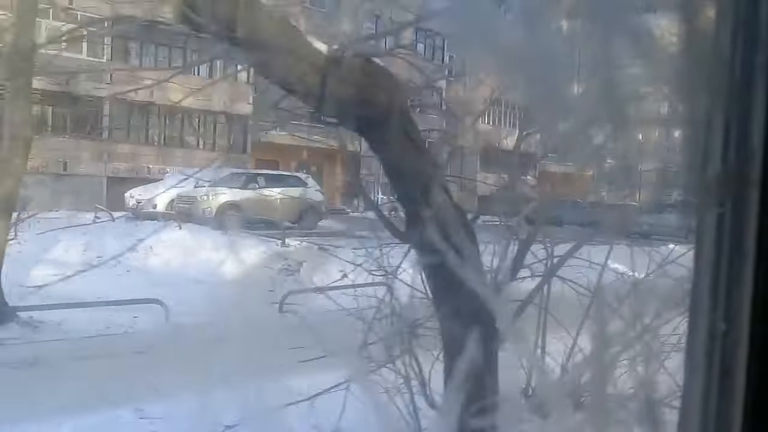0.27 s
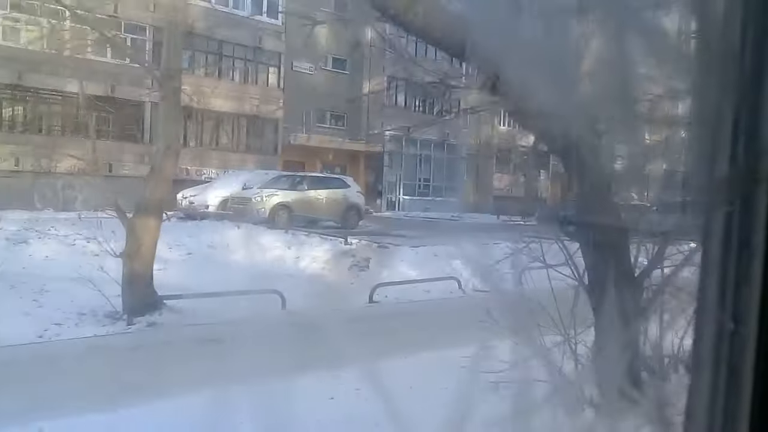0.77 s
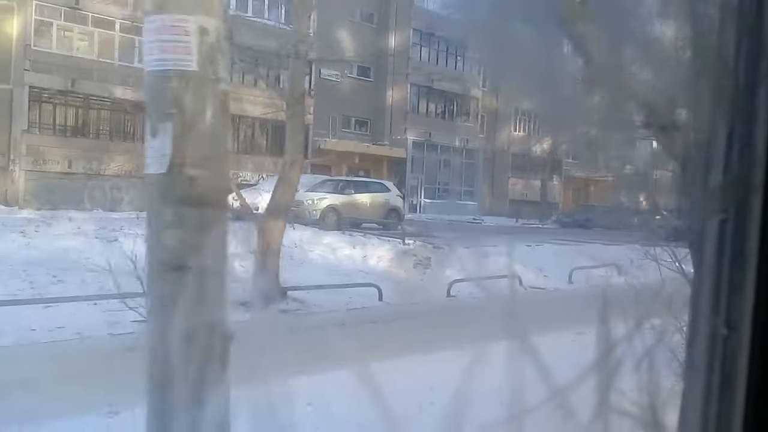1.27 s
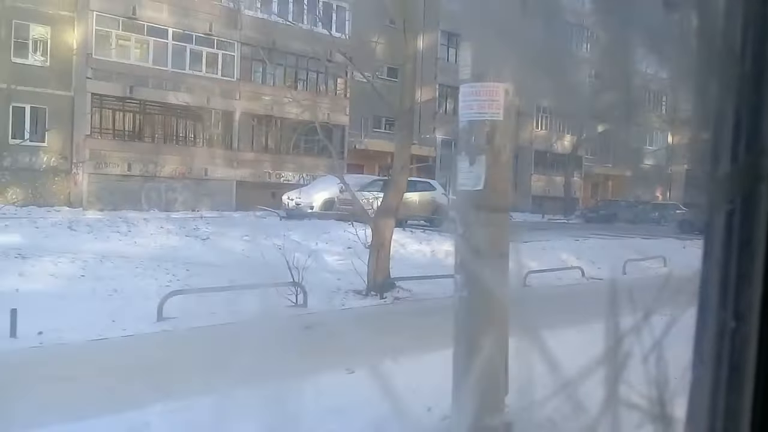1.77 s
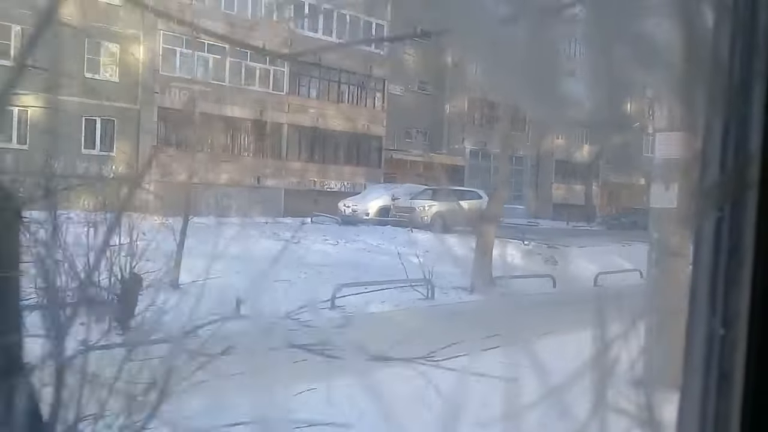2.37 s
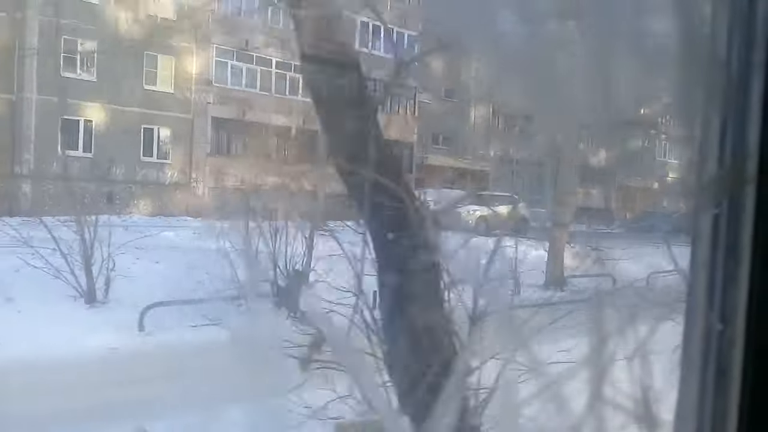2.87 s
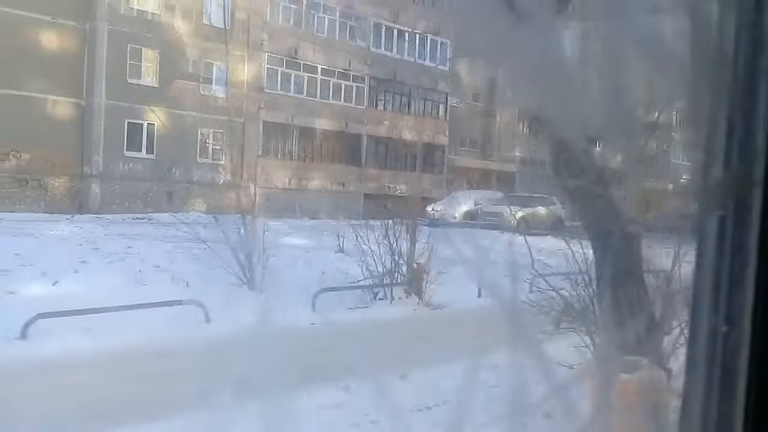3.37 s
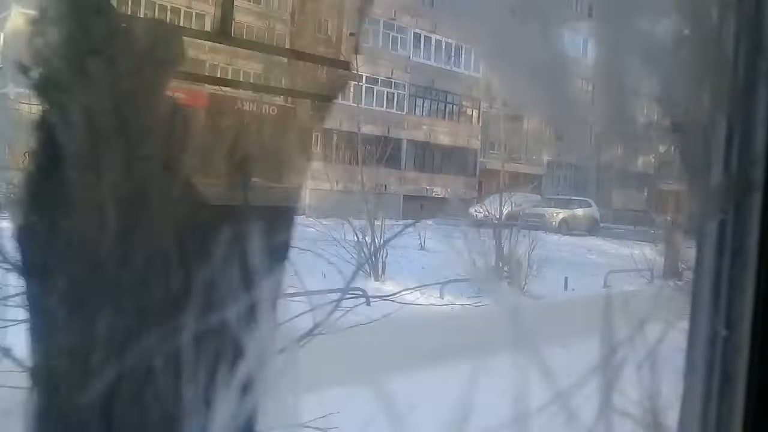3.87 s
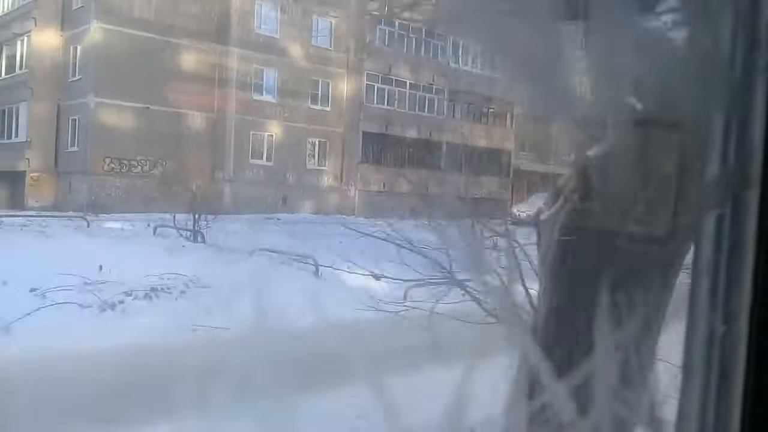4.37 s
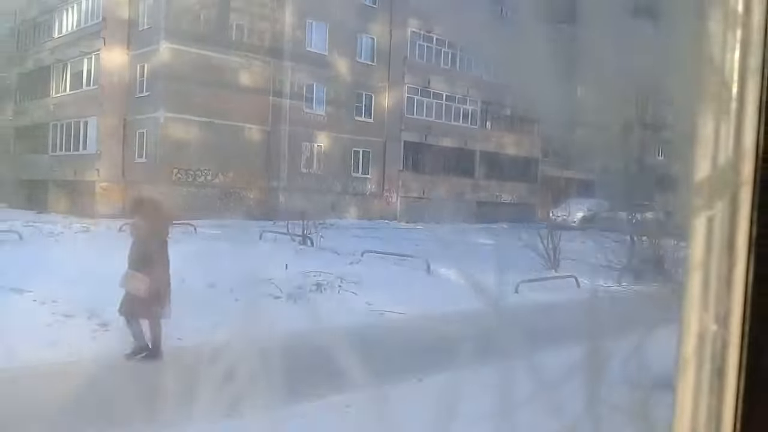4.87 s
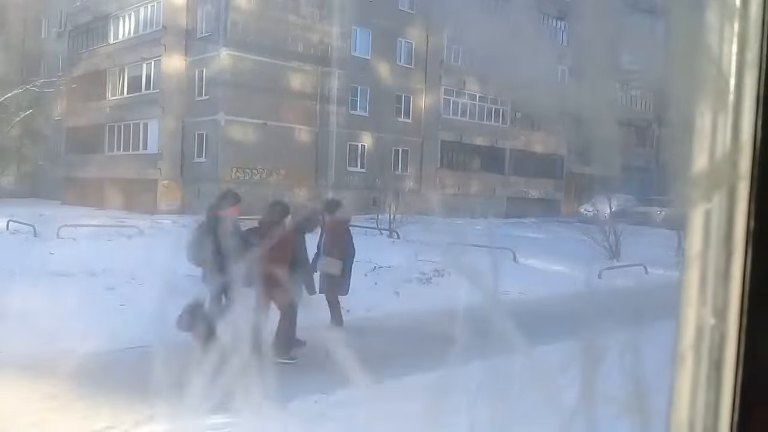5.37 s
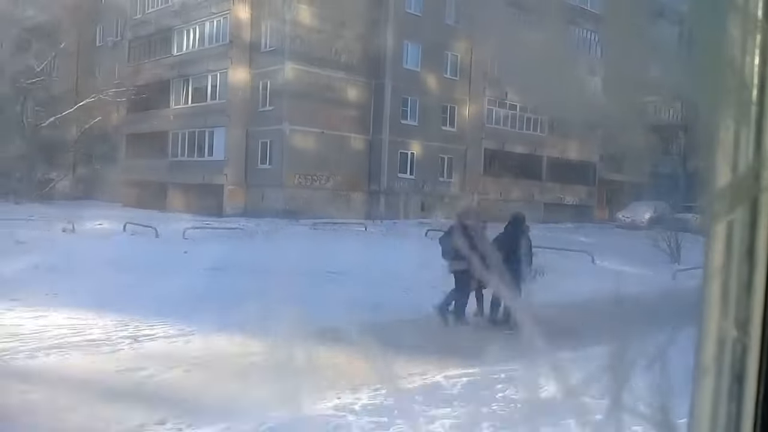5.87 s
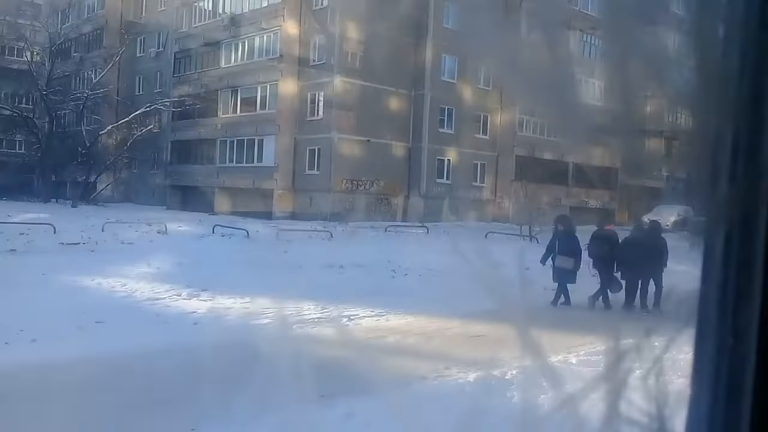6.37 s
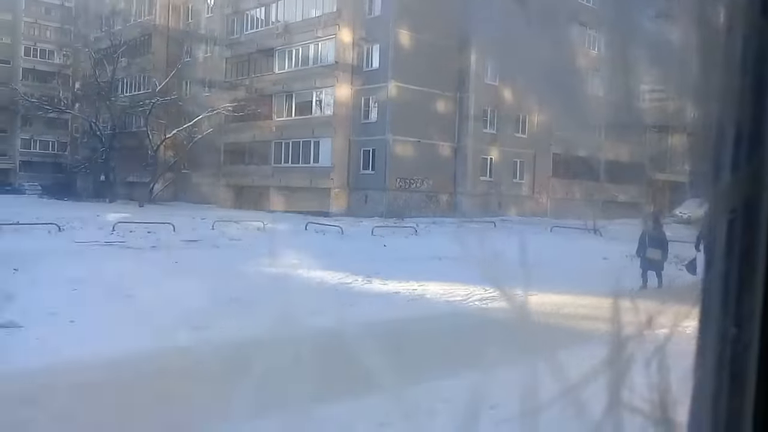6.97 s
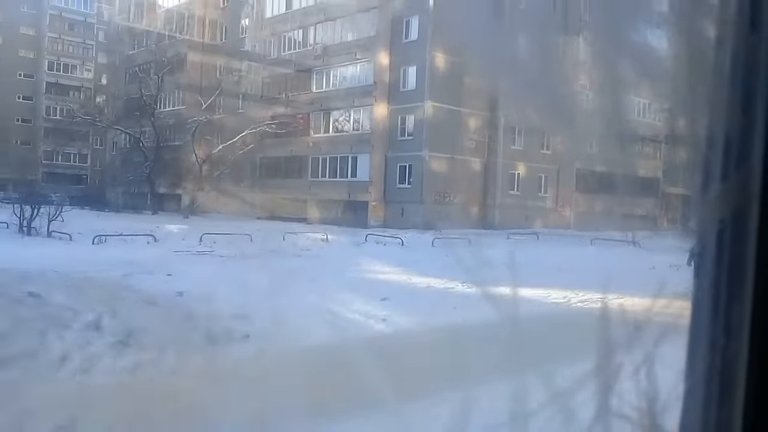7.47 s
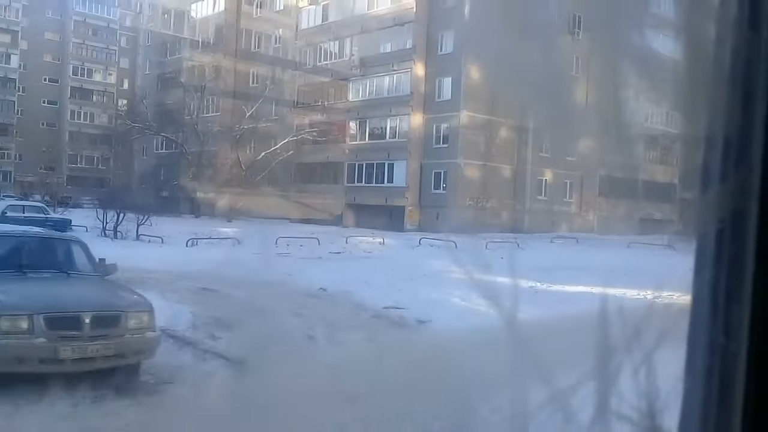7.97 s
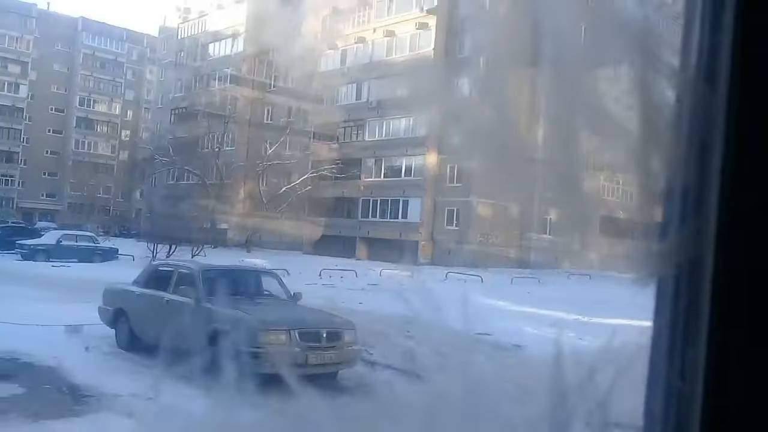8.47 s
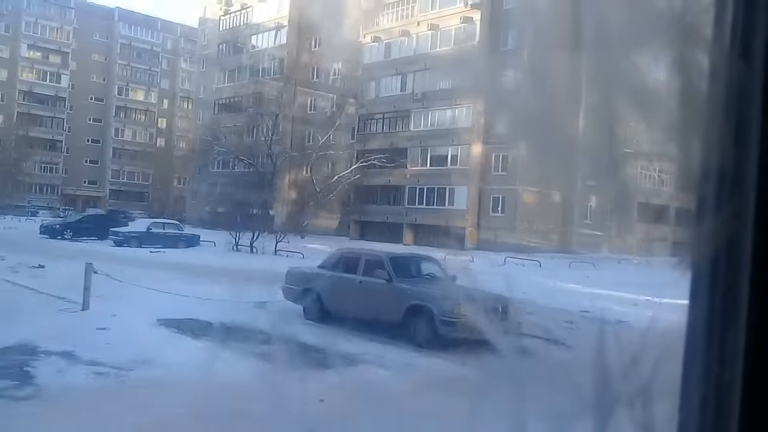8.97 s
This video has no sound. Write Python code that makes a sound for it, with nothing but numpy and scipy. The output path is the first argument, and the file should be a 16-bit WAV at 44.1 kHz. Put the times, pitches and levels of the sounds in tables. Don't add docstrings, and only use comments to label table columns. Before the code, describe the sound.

The sound is inside an electric bus gathering speed on packed snow, picked up by a small, dull microphone at the window. From the start a nearly constant low auxiliary hum with a beating fan tone sits over soft body rumble. Shaft and gear tones climb steadily, fastest in the first seconds, and tyre roar grows with them. At about 1.5 s a short rattle and pane knock; at 3.3 s a dull bump. The fan tone fades as the traction whine strengthens, dipping briefly around 4.3 and 5.2 s as the pull steps. Another knock comes near 5 s, with sparse dry ticks and a light rattle at 6.7 s. After 7.2 s the pull eases and the hum briefly drops. From 8.1 to 8.6 s ruts bring heavy thuds and a loud, bright, glassy clatter, strongest around 8.3, 8.4 and 8.6 s. It dies quickly, leaving roar, tones and small rattles until 9.2 s.

```python
import sys
import numpy as np
from scipy import signal
from scipy.io import wavfile
from scipy.ndimage import uniform_filter1d

SR = 44100
rng = np.random.default_rng(int(sys.argv[2]) if len(sys.argv) > 2 else 0)


def log_audio(samples):
    frames = np.atleast_2d(samples).T
    limited = np.clip(frames, -1, 1)
    pcm = np.round(limited * 32767).astype(np.int16)
    wavfile.write(sys.argv[1], SR, pcm)


def convert_level_to_amplitude(level_db):
    exponent = np.asarray(level_db, float) / 20
    return 10 ** exponent


N = 407043


def evened(x):
    return x / np.sqrt(np.mean(x ** 2) + 1e-20)


def read(points, hz):
    f, value = np.transpose(points)
    return np.interp(np.log(hz + 1), np.log(f + 1), value)


def columns(rows):
    s, *values = np.transpose(rows)
    return [np.interp(np.arange(N) / SR, s, v) for v in values]


def add(mix, s, sound):
    part = mix[round(s * SR):][:len(sound)]
    part += sound[:len(part)]


def band(x, order, low_hz, high_hz):
    sos = signal.butter(order, [low_hz, high_hz], "band", fs=SR, output="sos")
    return signal.sosfilt(sos, x)


def drift(top_hz, low_hz=.3):
    t = np.arange(0, N + 200, 200) / SR
    waves = 0
    for f in np.geomspace(low_hz, top_hz, num=24):
        waves = waves + np.sin(2 * np.pi * (f * t + rng.random())) / np.sqrt(f)
    return np.interp(np.arange(N) / SR, t, evened(waves))


def coloured(x, points):
    level_db = np.maximum(read(points, abs(np.fft.fftfreq(8192, 1 / SR))), -100)
    log_gain = np.log(convert_level_to_amplitude(level_db))
    taps = np.fft.ifft(np.exp(np.conj(signal.hilbert(log_gain)))).real[:4096]
    return signal.oaconvolve(x, taps)[:len(x)]


def tone(hz, db, waver_db, waver_hz):
    turns = np.cumsum(hz + waver_hz * drift(6.0)) / SR + rng.random()
    level_db = db + waver_db * np.clip(drift(9.0), -2, 1)
    return np.sqrt(2) * convert_level_to_amplitude(level_db) * np.sin(2 * np.pi * turns)


def patchy(points, size, patchy_db):
    frames, hz = 4 * N // size + 5, np.fft.rfftfreq(size, 1 / SR)
    a, b, patches = rng.standard_normal((frames, len(hz), 3)).T
    patches = uniform_filter1d(patches, size=12, axis=0)
    patches = evened(uniform_filter1d(patches, size=10, axis=1))
    z = (a + 1j * b) * convert_level_to_amplitude(read(points, hz)[:, None] + patchy_db * patches)
    return evened(signal.istft(z, nperseg=size, noverlap=size - size // 4)[1][:N])


# time in seconds, turns of the traction shaft in Hz.
SHAFT_SPEED = [(0, 55), (1, 66.28), (1.75, 75.94), (2.5, 81.86), (3.75, 93.4), (4.75, 101.4), (5.5, 107.3),
               (6.5, 114), (7.75, 118.3), (8.7, 123.6), (9.23, 124.3)]


def shaft_speed():
    return columns(SHAFT_SPEED)[0]


# frequency in Hz, level in dB per Hz.
BODY_RUMBLE = [(33, -35), (40, -16), (60, -3), (85, 0.5), (130, 1), (200, -1), (260, -7.5), (330, -9),
               (480, -15), (560, -22), (750, -22), (1000, -27.5), (2000, -78)]
# frequency in Hz, level in dB per Hz.
TYRE_ROAR = [(350, -30), (600, 3), (650, -4.5), (753, -6.5), (892, -11), (1240, -5), (1370, -6.5),
             (1880, -12), (2770, -14.5), (3250, -17), (3850, -33.5), (5050, -32.5), (6330, -54),
             (9000, -64), (11700, -88.5), (19800, -120)]
# its start, full depth, end of full depth and end, all in seconds.
RUTTED_PATCH = (7.9, 8.38, 8.5, 8.66)


def road():
    gained_hz = shaft_speed()
    gained_hz = gained_hz - gained_hz[0]
    ruts = np.interp(np.arange(N) / SR, RUTTED_PATCH, (0, 1, 1, 0))
    rumble_db = -24 + 0.0247 * gained_hz + 8 * ruts
    roar_db = -45.5 + 0.0728 * gained_hz + 4 * ruts
    buzz_db = -5.5 + 0.105 * gained_hz
    rumble = convert_level_to_amplitude(rumble_db) * patchy(BODY_RUMBLE, size=4096, patchy_db=1.52)

    t = np.arange(round(.3 * SR)) / SR
    echoes = rng.standard_normal(len(t)) * convert_level_to_amplitude(-60 * t / 0.13)
    roar = patchy(TYRE_ROAR, size=512, patchy_db=0.68)
    roar = roar + 0.42 * evened(signal.oaconvolve(roar, echoes)[:N])
    highpass = signal.butter(4, 3600, "high", fs=SR, output="sos")
    buzz = signal.sosfiltfilt(highpass, roar, padlen=300)
    roar = roar + (convert_level_to_amplitude(buzz_db) - 1) * buzz
    flicker_db = 0.85 + 0.2 * drift(40.0, low_hz=3.0)
    return rumble + convert_level_to_amplitude(roar_db + flicker_db) * evened(roar)


# time in seconds, shaft speed in Hz, level of its hum in dB.
AUX_MOTOR = [(0, 46.9, -26), (1.75, 46.78, -25.5), (3, 46.1, -24.5), (3.85, 45.83, -23), (5, 46.5, -25),
             (6.5, 47.27, -27.5), (7.3, 47.31, -26), (7.5, 47.34, -39), (7.8, 47.4, -39.5),
             (8.1, 47.5, -26.5), (9.23, 47.65, -32)]
AUX_MAIN_ORDERS = (1.0, 3.085, 5.0)
# multiple of the shaft speed, level in dB against the main tone it follows,
# which tone that is (0 shaft, 1 fan, 2 hum).
AUX_WEAK_TONES = [(3.0, -11, 1), (3.19, -14, 1), (6.17, -19, 1), (6.0, -14, 2), (9.0, -24, 2),
                  (12.0, -29, 2), (13.0, -34, 1), (15.0, -16, 0)]


def auxiliary():
    hz, hum_db = columns(AUX_MOTOR)
    sag_db = 4.5 * (hz - 47)
    shaft_db = -35.5 + sag_db
    fan_db = -19 + .6 * sag_db - 0.2748 * np.maximum(shaft_speed() - 81.2, 0)
    levels = shaft_db, fan_db, hum_db
    out = np.zeros(N)
    for k, db in zip(AUX_MAIN_ORDERS, levels):
        out += tone(k * hz, db, waver_db=0.8, waver_hz=0.27)
    for k, db, followed in AUX_WEAK_TONES:
        out += tone(k * hz, levels[followed] + db + 0.055, waver_db=1.0, waver_hz=0.081 * k)
    return out


# start in seconds, peak in dB.
TRIM_TICKS = [(0.4906, -52), (0.9016, -53.5), (1.527, -48.5), (1.954, -51.5), (2.037, -51.5),
              (2.1157, -51.5), (4.7035, -52), (4.894, -50), (4.9836, -46.5), (5.2874, -55.5),
              (5.453, -44.5), (5.9915, -55), (6.1855, -47), (6.42, -45.5), (6.545, -48), (7.3028, -46.5),
              (7.8396, -47), (7.9906, -46.5), (9.039, -46)]


def ticks():
    out = np.zeros(N)
    t = np.arange(900) / SR
    for s, db in TRIM_TICKS:
        puff = rng.standard_normal(900) * convert_level_to_amplitude(-60 * t / .035)
        puff = band(puff, 4, 3600, 5300) + .1 * band(puff, 2, 8000, 12000)
        add(out, s, convert_level_to_amplitude(db - 1.0) * puff / abs(puff).max())
    return out


# start in seconds, level in dB, pitch in Hz.
SUSPENSION_THUDS = [
    (8.08, -17, 115),
    (8.27, -21, 150),
    (8.415, -20, 190),
    (8.47, -21, 150),
    (3.29, -22, 125),
]


def thuds():
    out = np.zeros(N)
    t = np.arange(round(.4 * SR)) / SR
    for s, db, hz in SUSPENSION_THUDS:
        boom = evened(band(rng.standard_normal(len(t)), 3, .7 * hz, 1.5 * hz))
        add(out, s, convert_level_to_amplitude(db - 60 * t / .45) * (1 - np.exp(-t / .008)) * boom)
    return out


# start in seconds, peak in dB, pitch in Hz, time to fall 60 dB in seconds.
PANE_KNOCKS = [(1.571, -31.5, 2840, 0.091), (1.572, -47, 5000, 0.083), (1.6, -30, 2790, 0.11),
               (5.062, -28.5, 2330, 0.064), (6.709, -34, 2780, .05), (8.267, -15.5, 2806, 0.04),
               (8.28, -24, 2302, 0.059), (8.43, -34, 2940, 0.055), (8.565, -20, 2950, 0.054),
               (8.566, -17, 1430, 0.083), (8.935, -34, 2600, 0.04), (9.118, -26, 2770, 0.045)]


def knocks():
    out = np.zeros(N)
    t = np.arange(round(.4 * SR)) / SR
    for s, db, hz, t60 in PANE_KNOCKS:
        ring = sum(np.sin(2 * np.pi * (hz * k * t + rng.random())) for k in (.93, 1, 1.06))
        add(out, s, convert_level_to_amplitude(db - 7.5 - 60 * t / t60) * (1 - np.exp(-t / .0004)) * ring)
    return out


# frequency in Hz, level in dB per Hz.
TRIM_COLOUR = [(260, -58), (520, -4), (820, -7), (1130, -9), (1420, -4.5), (1850, -7), (2910, -1.5),
               (3400, -3), (3800, -14), (5110, -16), (6600, -33.5), (10500, -34), (13500, -41.5),
               (15800, -53.5)]
# pitch in Hz, width of the resonance in Hz, level in dB.
RINGING_PANES = [(1370, 47, -11), (1940, 230, 1.5), (2436, 110, -4), (2940, 130, -3), (3320, 50, 3),
                 (4240, 54, -16), (4970, 74, -15.5)]


def rattle(db, tilt_db, rise):
    t = np.arange(round(.6 * SR)) / SR
    strength = convert_level_to_amplitude(1.1 * np.minimum(rng.exponential(1, len(t)), 3))
    struck = rng.random(len(t)) < 900 / SR
    hits = strength * struck * rng.choice([-1, 1], len(t))
    drive = evened(evened(hits) + 0.95 * rng.standard_normal(len(t)))
    clumps = evened(uniform_filter1d(rng.standard_normal(len(t)), size=130))
    drive = evened(drive * convert_level_to_amplitude(1.8 * clumps))

    hold = .028 + .6 * rise
    after = np.maximum(t - rise - hold, 0)
    decay = convert_level_to_amplitude(-60 * after / .26) + .3 * convert_level_to_amplitude(-60 * after / .6)
    shape = np.clip(t / max(rise, .001), 0, 1) * decay

    fizz_db = min(-9 + 1.1 * max(db + 33.5, 0), 3)
    colour = []
    for f, level in TRIM_COLOUR:
        level += max(tilt_db, -1) * min(np.log2(f / 3000), 0)
        level += fizz_db * max(np.log2(f / 5000), 0)
        colour.append((f, level + 2.0 * rng.uniform(-1, 1)))
    sound = coloured(drive * shape, colour)

    ring, ring_t = 0, t[:2000]
    for f, width, d in RINGING_PANES:
        pitch = f * rng.uniform(0.94, 1.04)
        ring = ring + convert_level_to_amplitude(d - 93.0 * width * ring_t) * np.sin(2 * np.pi * pitch * ring_t) * width
    rung = signal.oaconvolve(sound, ring)[:len(t)]
    sound = evened(sound) + 0.51 * evened(rung)
    return convert_level_to_amplitude(db - 7.5) * evened(sound) * np.sqrt(np.mean(shape ** 2))


# start in seconds, rattle level in dB,
# change of brightness in dB per octave below 3 kHz, rise time in seconds.
ROAD_JOLTS = [(1.346, -51, 8, .026), (1.525, -42.5, -1, 0.0019), (1.565, -32, -2, .003),
              (2.378, -46, -1.5, .027), (3.118, -52.5, 6, 0.025), (5.001, -43.5, 7.5, 0.022),
              (5.05, -40, 3.5, 0.012), (5.624, -48, 9.5, 0.023), (6.708, -36, 0, .006),
              (6.781, -44.5, 2, .009), (7.462, -39, -3, 0.013), (8.11, -28.5, -3, 0.018),
              (8.134, -33, 2, 0.0017), (8.197, -32.5, -4, .022), (8.247, -25.5, -0.5, 0.0018),
              (8.262, -17, -0.4, 0.0028), (8.372, -28, 2, 0.0064), (8.416, -17.5, 0, .0036),
              (8.512, -25, 1.3, 0.0023), (8.563, -20, -0.5, .0024), (8.751, -32, -2, 0.016),
              (8.934, -44, -3, .0025), (9.026, -42.5, 0.5, .016), (9.131, -36.5, 5, 0.019),
              (1.645, -45, 1.5, 0.0092), (5.11, -47, 2, .01)]


def clatter():
    out = np.zeros(N)
    for s, *jolt in ROAD_JOLTS:
        add(out, s, rattle(*jolt))
    return out


# centre in Hz, width in Hz,
# level of a tone at the top in dB.
CABIN_RESONANCES = [(74, 11, -32), (91.5, 5.9, -28), (101, 6.5, -26), (114.43, 5.5, -18),
                    (126.8, 2.4, -17.5), (185, 45, -19), (287, 27, -33.5), (355, 35, -34), (384, 21, -28.5),
                    (405.7, 27, -27.5), (446.5, 30, -30.5), (514, 170, -34), (674, 37, -36), (755, 43, -32)]


def cabin(hz):
    power = 0
    for f, width, db in CABIN_RESONANCES:
        power = power + convert_level_to_amplitude(db) ** 2 / (1 + (2 * (hz - f) / width) ** 2) ** 2
    return 10 * np.log10(power)


SHAFT_ORDERS = (1.015, 2.0, 4.0)
SHAFT_LEVELS = (0.8, -8.5, -1.54, -7)
# time in seconds, multiple of the shaft speed.
MOTOR_WHINE = [(0, 5.89), (3, 5.86), (4.1, 5.97), (5, 6.03), (6.3, 6.06), (9.23, 5.97)]
# multiple of the shaft speed, level in dB, shaft speed in Hz where loudest,
# loss in dB per Hz away from it.
GEAR_TONES = [(2.865, 1.5, 105.4, .6), (5.87, -6, 110.5, 0.4)]
# time in seconds, length in seconds, dip in dB.
PULL_NOTCHES = [
    (3.62, .12, -7),
    (4.28, .12, -15),
    (4.63, .07, -8),
    (5.24, .18, -22),
    (5.8, .16, -6),
    (6.35, .12, -8),
    (6.76, .1, -7),
    (7.13, .1, -8),
]


def traction():
    hz, t = shaft_speed(), np.arange(N) / SR
    pull_db = -7.5 * np.clip((t - 7.2) / 0.27, 0, 1)
    for s, length, db in PULL_NOTCHES:
        pull_db += db * np.exp(-(2 * (t - s) / length) ** 2)
    out = np.zeros(N)
    for k, db in zip(SHAFT_ORDERS, SHAFT_LEVELS):
        level_db = db + cabin(k * hz) + (0.26 + 0.8 * (k > 2)) * pull_db
        out += tone(k * hz, level_db, waver_db=2.9 + 0.22 * k, waver_hz=.1 * k ** 2 + 0.33)
    whine_hz = columns(MOTOR_WHINE)[0] * hz
    whine_db = SHAFT_LEVELS[3] + cabin(whine_hz) + 0.27 * pull_db
    out += tone(whine_hz, whine_db, waver_db=3.0, waver_hz=4.0)
    for k, db, best_hz, loss in GEAR_TONES:
        level_db = db - loss * abs(hz - best_hz) + cabin(k * hz) + .6 * pull_db
        out += tone(k * hz, level_db, waver_db=4.0, waver_hz=.35 * k)
    return out


def scene():
    n = np.arange(N)
    ends = np.minimum(np.minimum(n + 6, N - n) / 30, 1)
    ride = traction() + auxiliary() + road()
    bumps = clatter() + thuds() + ticks() + knocks()
    return ((ride + bumps) * ends)[None]


def band_limit(x):
    return signal.sosfilt(signal.butter(12, 15690, fs=SR, output="sos"), x)


def record(dry):
    heard = dry + convert_level_to_amplitude(-81.5) * rng.standard_normal(dry.shape)
    limited = heard / (1 + (heard / .8) ** 4) ** .25
    return band_limit(limited)


dry = scene()
out = record(dry)
log_audio(out)
```